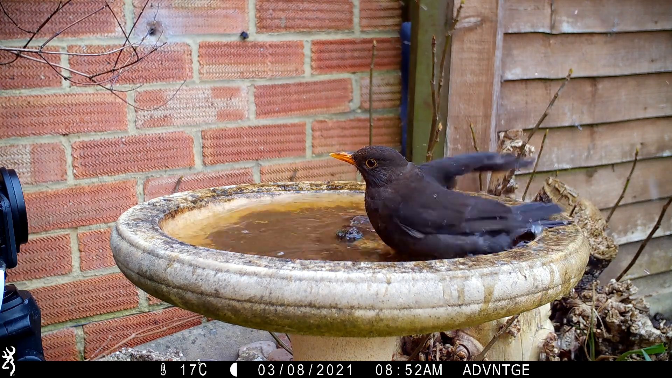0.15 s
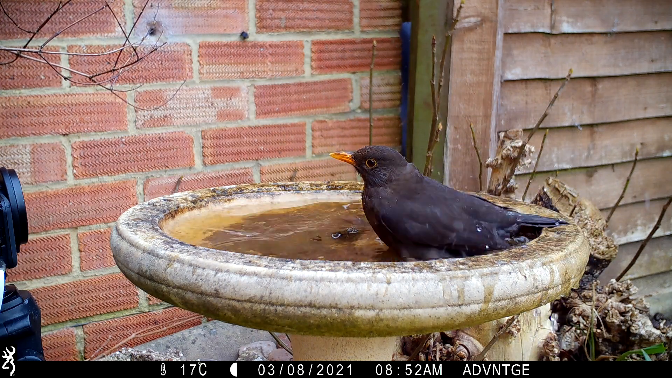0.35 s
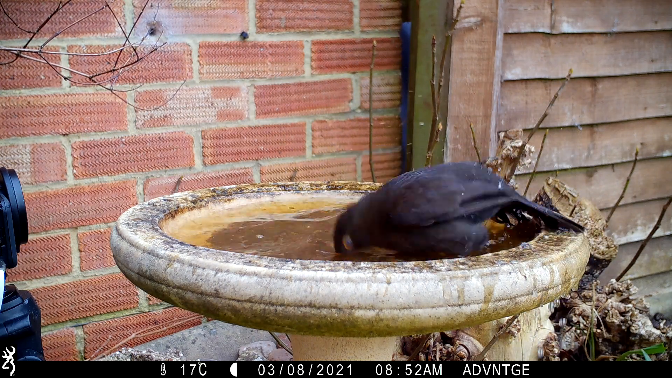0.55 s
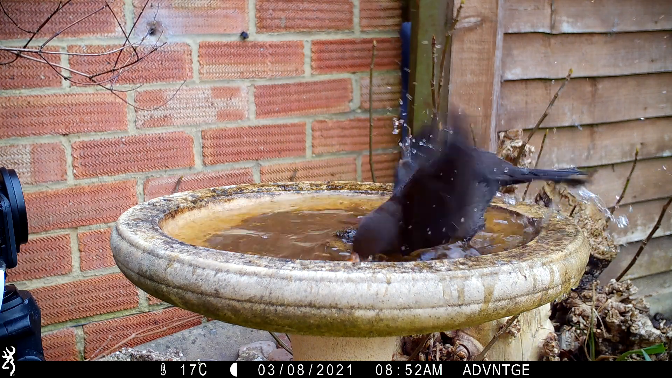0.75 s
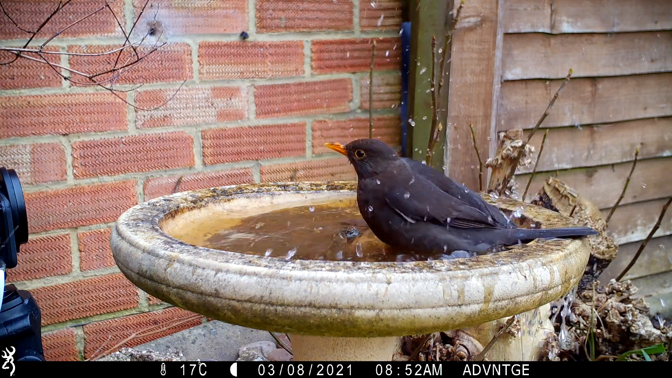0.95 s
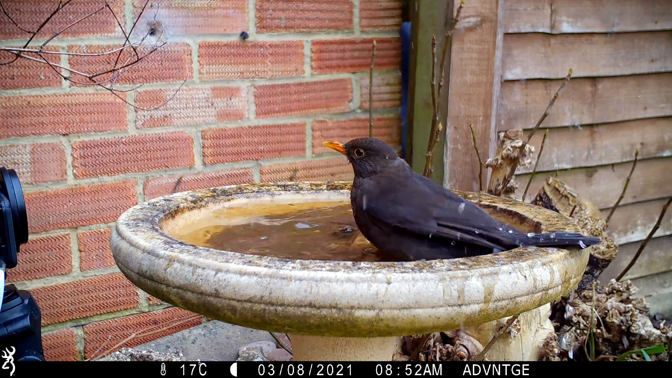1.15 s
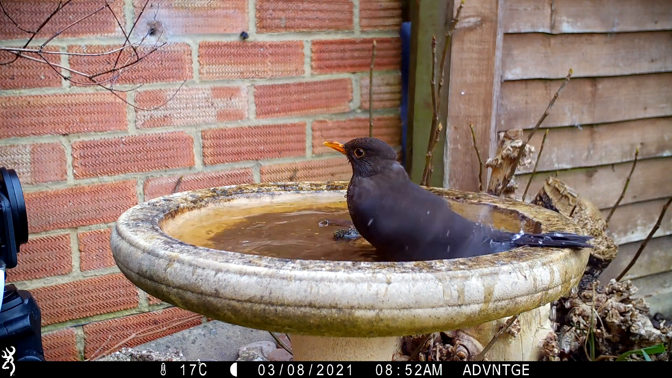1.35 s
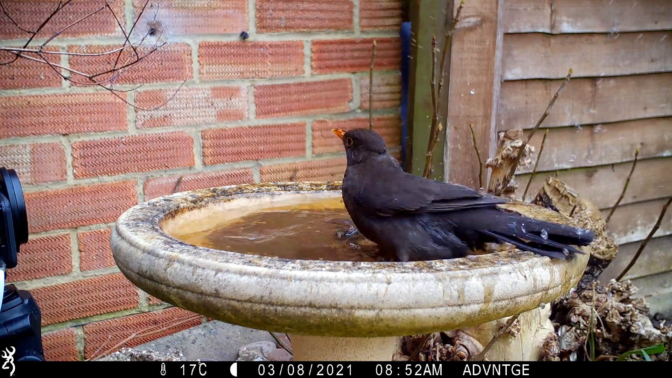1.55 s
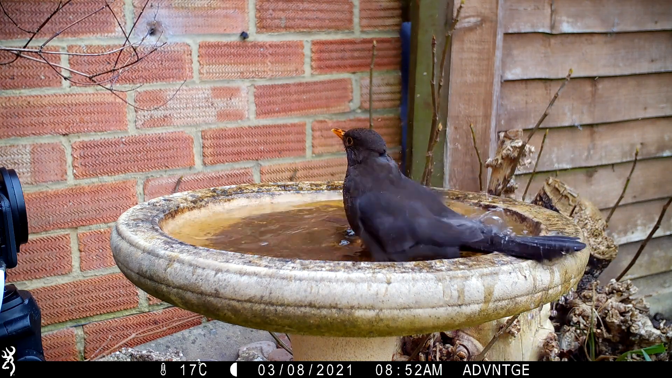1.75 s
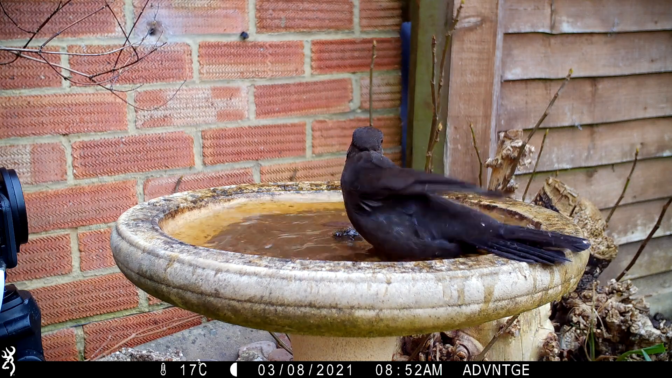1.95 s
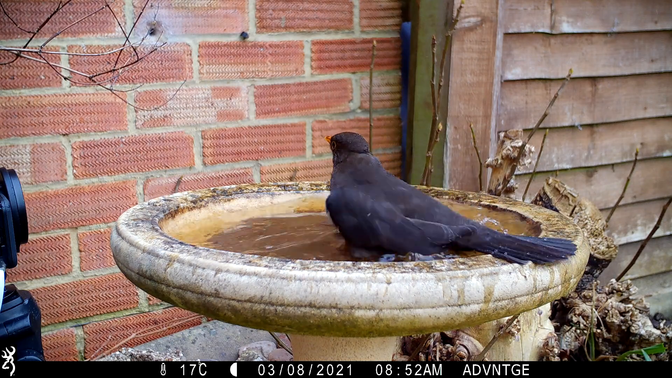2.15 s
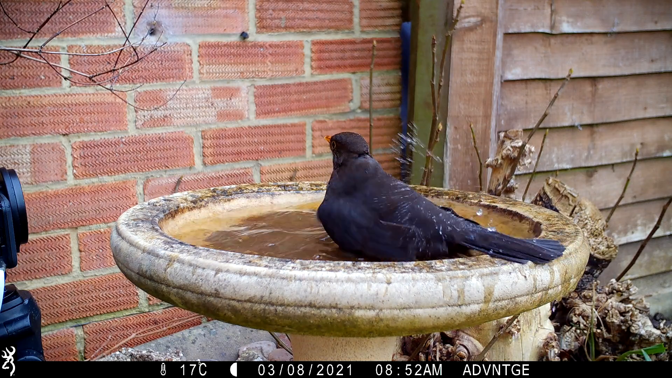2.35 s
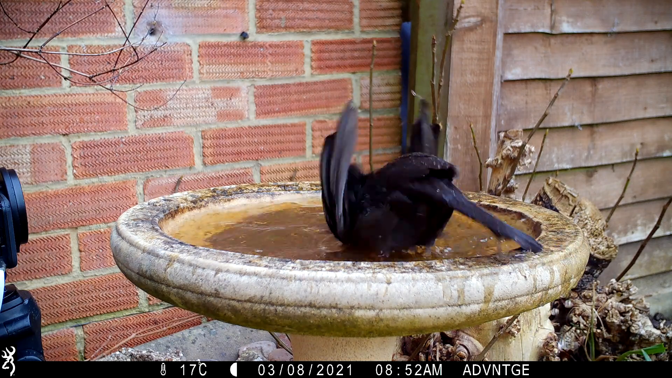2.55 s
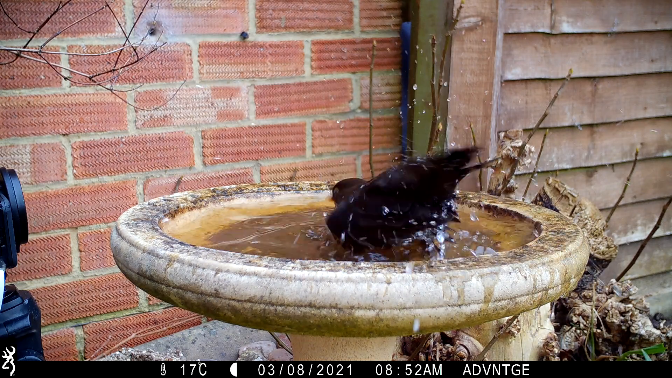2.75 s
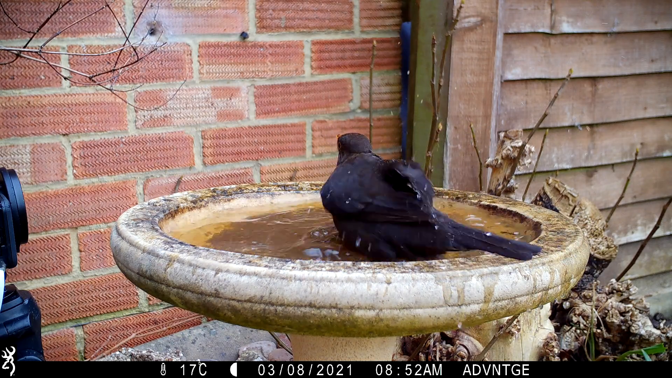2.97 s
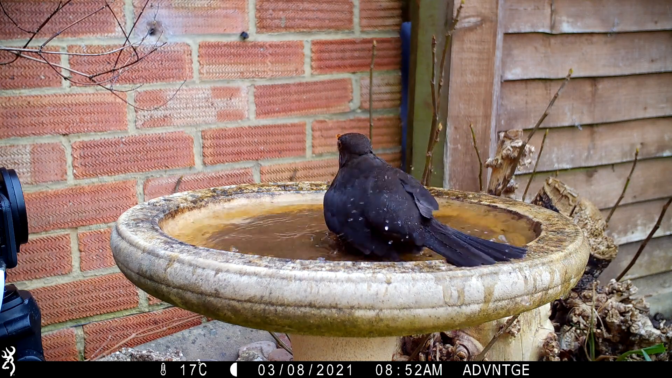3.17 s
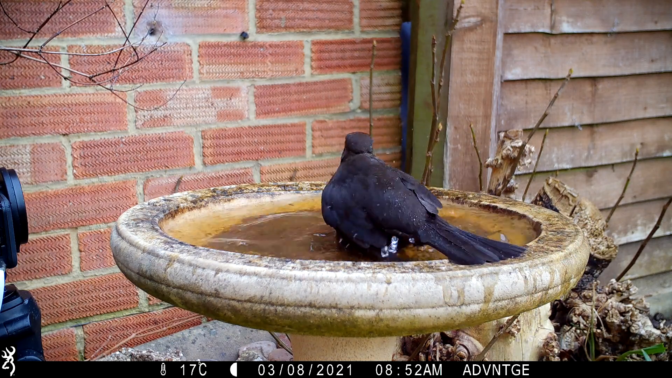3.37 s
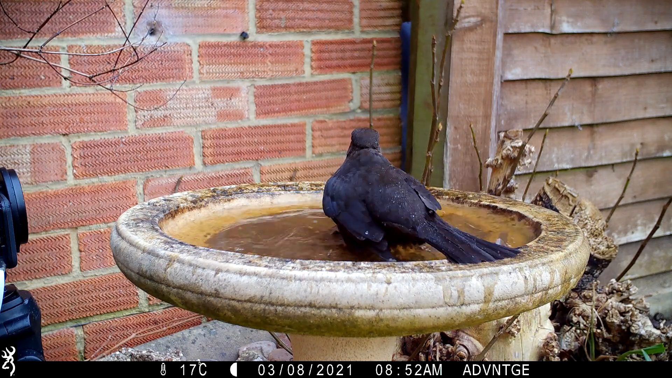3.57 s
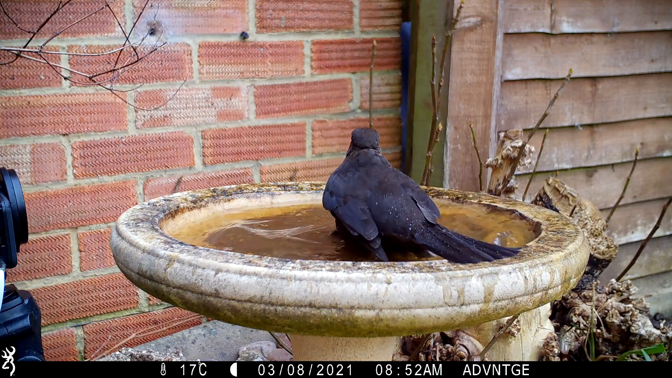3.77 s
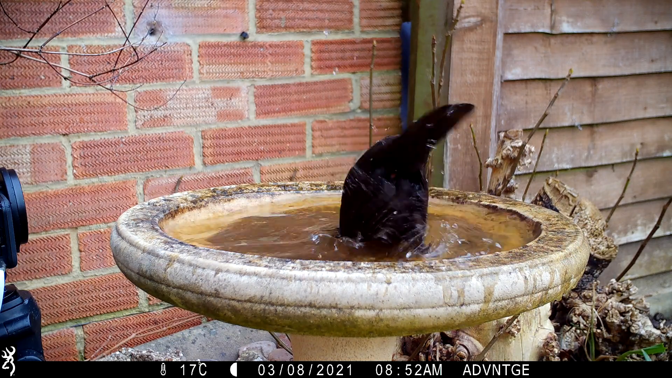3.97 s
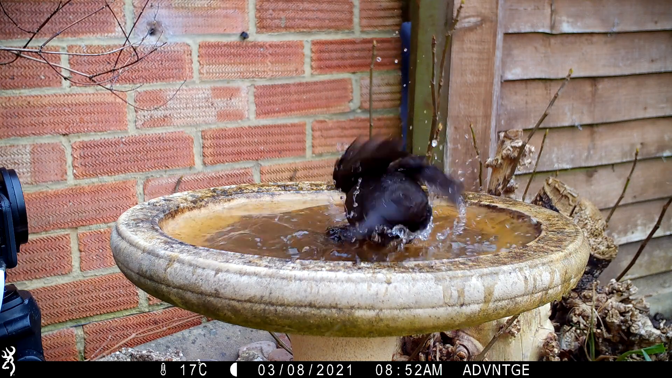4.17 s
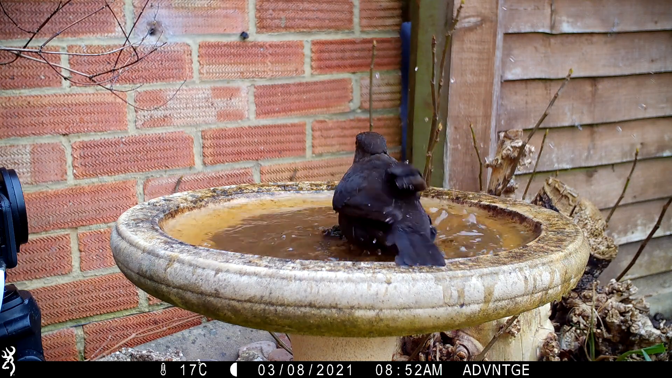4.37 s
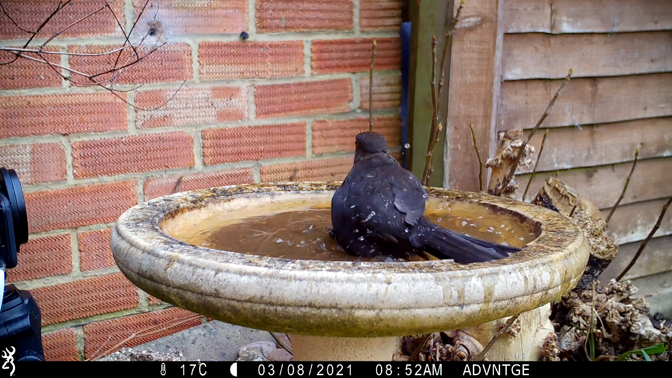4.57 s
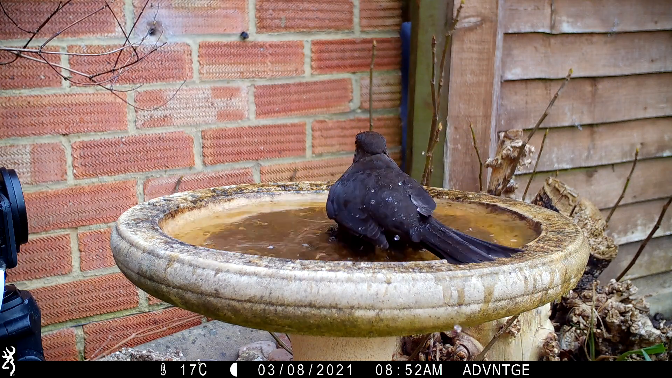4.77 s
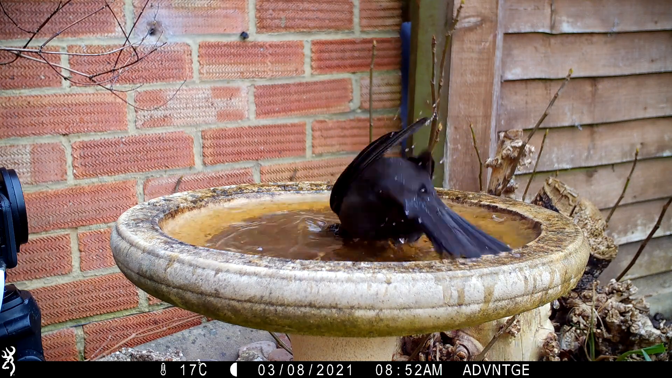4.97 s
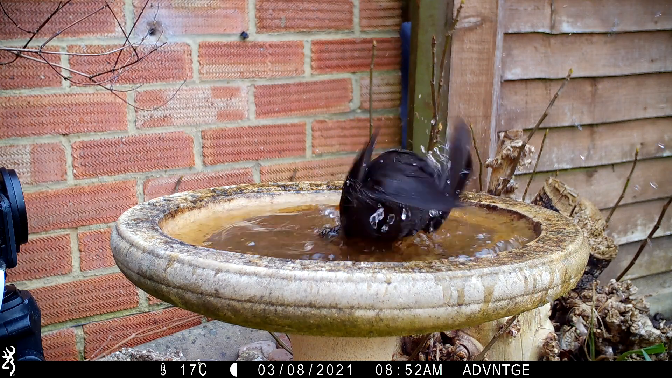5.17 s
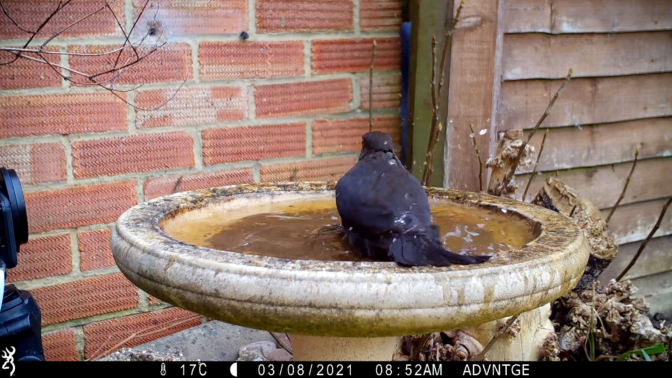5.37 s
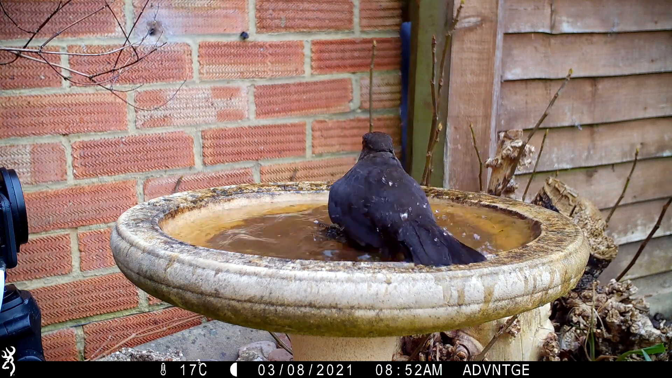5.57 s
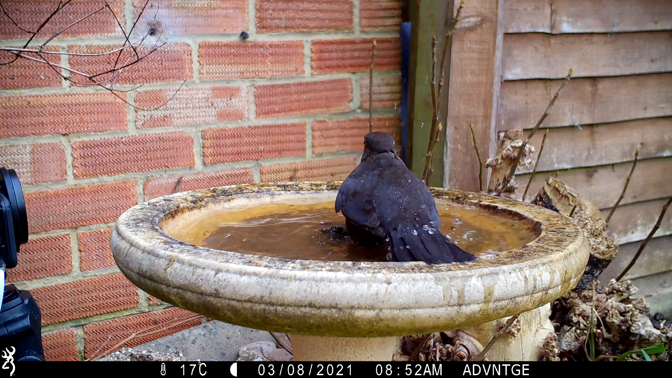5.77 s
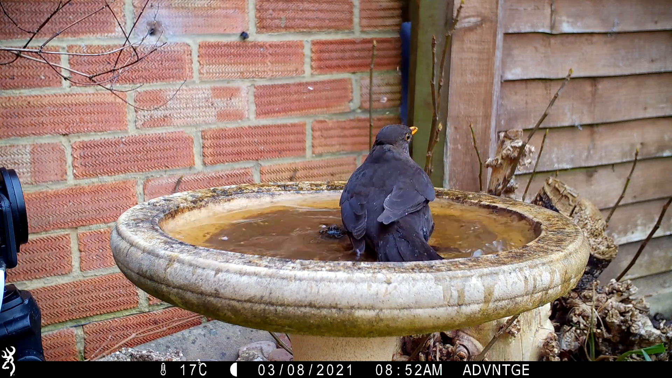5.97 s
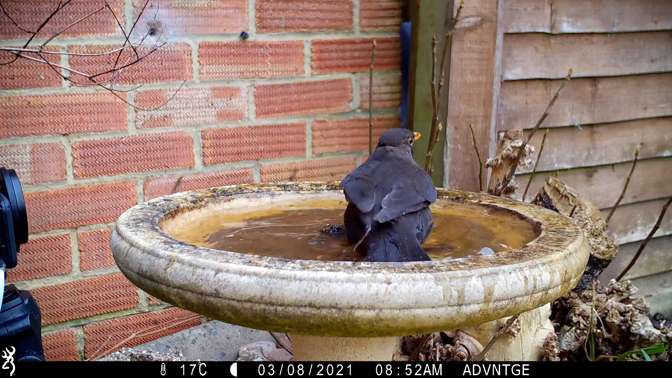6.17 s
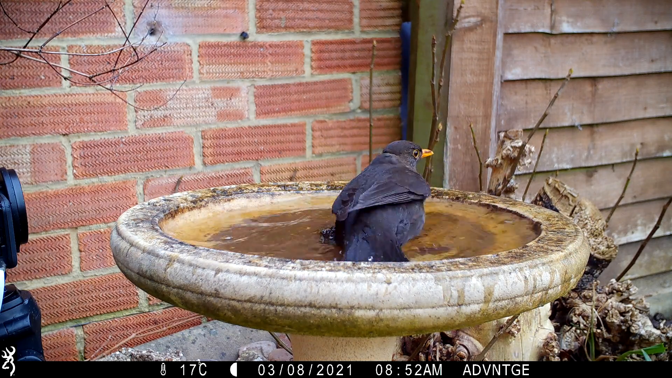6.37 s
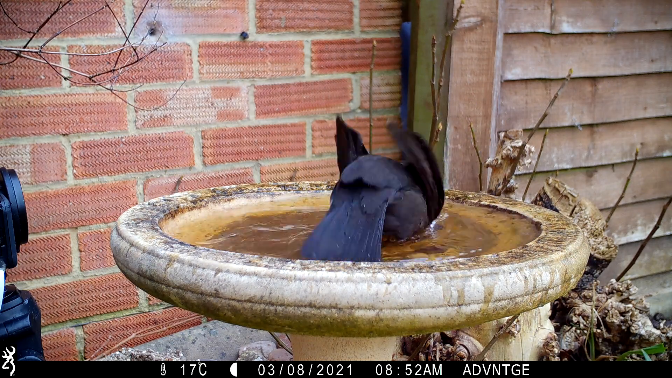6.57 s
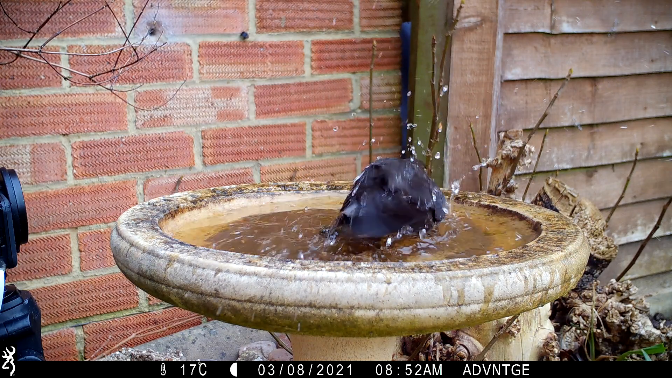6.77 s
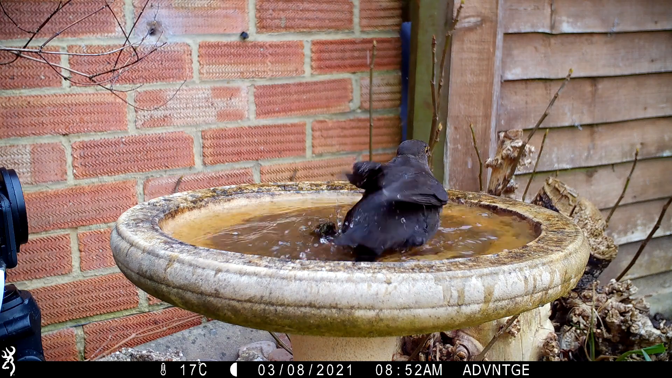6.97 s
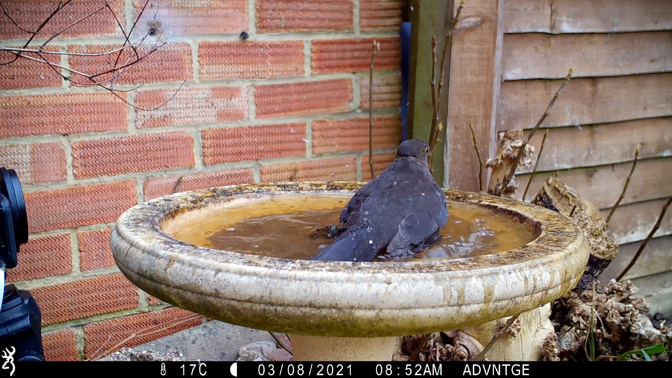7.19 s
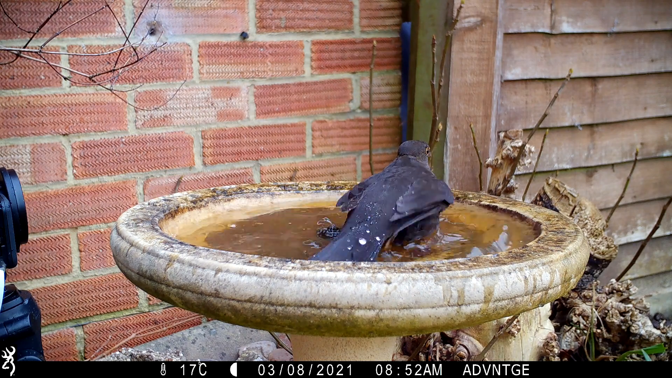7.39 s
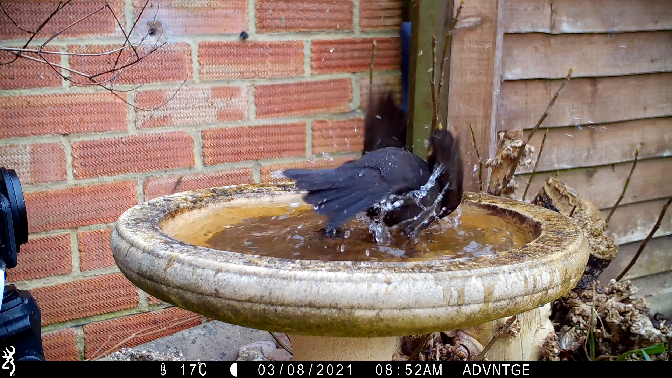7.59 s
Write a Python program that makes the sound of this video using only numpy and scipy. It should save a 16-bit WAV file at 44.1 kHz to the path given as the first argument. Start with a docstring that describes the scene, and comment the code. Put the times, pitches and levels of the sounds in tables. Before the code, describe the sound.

In a garden corner, heard from close by, a bird splashes in a stone basin: small sloshes, drips and bubbly plinks, two beak knocks, then a fast flurry of wet wing claps. It keeps ducking and shaking, each time with a short ringing knock and a spatter of water. Behind it are soft, steady outdoor air, thin distant whistles and twitters, and a barely audible hum and whine.

```python
"""A blackbird bathes in a shallow stone birdbath, in the corner of a brick wall and a fence.
Its wet wings clap, and its beak knocks the bowl as it ducks. The water sloshes, trapped air
plinks as bubbles, and flung drops patter down. Small birds call far off over a steady outdoor
rush. A small trail camera close by picks it all up and adds a faint hum and whine."""
import sys
import numpy as np
from scipy import signal
from scipy.fft import rfft, irfft
from scipy.io import wavfile
from scipy.ndimage import uniform_filter1d

SR = 44100
rng = np.random.default_rng(int(sys.argv[2]) if len(sys.argv) > 2 else 0)


def log_audio(samples):
    """Write samples as a 16-bit WAV file to the path given in sys.argv[1]."""
    # one column per channel
    frames = np.atleast_2d(samples).T
    # limit to full scale, then quantise
    limited = np.clip(frames, -1, 1)
    pcm = np.round(limited * 32767).astype(np.int16)
    wavfile.write(sys.argv[1], SR, pcm)


N = 336483
TIME = np.arange(N) / SR  # seconds since the scene began
AGE = np.arange(8192) / SR  # seconds since one short sound began


def undb(db):
    """Turn decibels into a number to multiply by."""
    return 10 ** (np.asarray(db) / 20)


def level(x, db):
    """Set a sound's average (rms) level."""
    return x * undb(db) / np.sqrt(np.mean(x ** 2))


def peak(x, db):
    """Set a sound's highest level."""
    return x * undb(db) / np.abs(x).max()


def add(track, s, sound):
    """Mix a sound into the track, starting at s seconds."""
    start = int(np.clip(s * SR, 0, N - 1))
    track[start:start + len(sound)] += sound[:N - start]


def band(x, hz, width_hz):
    """Keep the sound near one pitch; a narrower band rings longer."""
    sharpness = hz / min(width_hz, SR / 4)
    return signal.lfilter(*signal.iirpeak(min(hz, SR / 2 - 2000), sharpness, fs=SR), x)


def lowpass(x, hz, order):
    """Turn down the treble above hz; a higher order cuts more steeply."""
    return signal.sosfilt(signal.butter(order, min(hz, SR / 2 - 1), fs=SR, output="sos"), x)


def highpass(x, hz, order):
    """Turn down the bass below hz."""
    return signal.sosfilt(signal.butter(order, hz, "high", fs=SR, output="sos"), x)


def walk(rate):
    """A smooth random drift, about 1 in size, that changes course rate times a second."""
    step = int(SR / rate)
    drift = uniform_filter1d(np.repeat(rng.standard_normal(N // step + 1), step), step)[:N]
    return drift / drift.std()


def grains(rate, spread_db):
    """A short burst of tiny random hits, rate a second, a few much larger than the rest."""
    size = len(AGE)
    hits = (rng.random(size) < rate / SR) * rng.choice([-1, 1], size)
    return hits * undb(spread_db * np.minimum(rng.exponential(size=size), 4))


def click():
    """A single sharp hit."""
    return signal.unit_impulse(len(AGE))


def hiss():
    """A short burst of even noise."""
    return rng.standard_normal(len(AGE))


def fade(t60):
    """A fade that falls by 60 dB in t60 seconds."""
    return undb(-60 * AGE / t60)


def corner(x, echo_s, echo_db, tail_db, t60=0.068):
    """The brick wall sends back one echo; fence and paving scatter a short tail."""
    response = hiss() * fade(t60) * (AGE > .001)
    response *= undb(tail_db) / np.linalg.norm(response)
    response[0] = 1  # the sound that arrives directly
    response[int(echo_s * SR)] += undb(echo_db)
    return signal.fftconvolve(x, response)[:N]


def electronics(whine_hz=7796.2, buzz_hz=29.75, whine_db=-79):
    """The camera's low hum, and a high whine that buzzes as its wave keeps flipping upside down."""
    # tones of the hum: f/Hz, average level/dB
    hum_tones = [(66, -82.5), (100, -77)]
    hum = sum(undb(db) * np.sin(2 * np.pi * (hz * TIME + rng.random())) for hz, db in hum_tones)
    whine = np.sin(2 * np.pi * whine_hz * TIME) * signal.square(2 * np.pi * buzz_hz * TIME)
    return np.sqrt(2) * (hum + undb(whine_db) * band(whine, whine_hz, 2500))


def rush(rush_db=-49):
    """Steady outdoor air and far traffic, coloured by the hollow camera case."""
    # how strong the rush is from bass to treble: f/Hz, relative level/dB
    rush_shape = [(25, -16), (55, -11.5), (160, -9.5), (300, -7), (550, -2.5), (1100, 2), (1900, -0.5),
                  (2900, -3.5), (3900, -11), (4900, -22), (6000, -26.5), (8700, -43.5), (11500, -43),
                  (15500, -45)]
    # pitches at which the case rings: f/Hz, width/Hz, boost/dB
    case_rings = [(256.8, 18, 5), (397.6, 35, 9), (626.3, 89, 9), (983, 51, 5.5), (1460.5, 103, 10),
                  (1573, 27, 9), (2300, 210, 0.5), (2677, 80, 4), (3510, 93, 8), (3830, 35, 7)]
    hz = np.maximum(np.fft.rfftfreq(N, 1 / SR), 1)
    points_hz, points_db = np.transpose(rush_shape)
    db = np.interp(np.log(hz), np.log(points_hz), points_db)
    db += sum(boost / (1 + (2 * (hz - centre) / width) ** 2) for centre, width, boost in case_rings)
    air = irfft(rfft(rng.standard_normal(N)) * undb(db), N)
    return level(air, rush_db) * undb(0.53 * walk(0.95) + 0.053 * walk(26))


def twitter(count, note_s=0.023, arch_octaves=.2, leap_octaves=.11, spread_db=6):
    """A quick, uneven run of bird notes, as rows: t/s, length/s, f/Hz, arch/octaves, level/dB."""
    # the tune that the notes leap around: t/s, f/Hz, level/dB
    tune = [(4.885, 4045, -49), (5.03, 4300, -50.5), (5.17, 4600, -57), (5.35, 4400, -57.5),
            (5.52, 4120, -57)]
    times, tune_hz, tune_db = np.transpose(tune)
    late, leap, loud = rng.uniform(-1, 1, (count, 3)).T
    starts = np.linspace(times[0], times[-1], count) + late * note_s
    pitches = np.interp(starts, times, tune_hz) * 2 ** (leap_octaves * leap)
    levels = np.interp(starts, times, tune_db) + spread_db * loud
    return [(s, note_s, hz, arch_octaves, db) for s, hz, db in zip(starts, pitches, levels)]


def songbirds(flutter_db=3, waver_octaves=0.019, arch_octaves=0.019):
    """Far whistles and twitters, each rising and falling in pitch, blurred by the gardens between."""
    # thin whistles: t/s, length/s, f/Hz, level/dB
    whistles = [(0.599, 0.08, 3870, -55), (2.22, .091, 4370, -62), (3.295, 0.082, 3340, -52.5),
                (5.235, 0.0988, 3836, -55), (5.83, 0.11, 4180, -63)]
    out = np.zeros(N)
    notes = [(s, length, hz, arch_octaves, db) for s, length, hz, db in whistles]
    for s, length, hz, arch, db in notes + twitter(count=19):
        along = np.linspace(-1, 1, int(length * SR))
        pitch = hz * 2 ** (-arch * along ** 2 + waver_octaves * walk(250)[:len(along)])
        swell = np.sqrt(1 - along ** 2)
        add(out, s, undb(db) * swell * np.sin(2 * np.pi * np.cumsum(pitch) / SR))
    out *= undb(flutter_db * walk(200))
    return corner(out, echo_s=0.027, echo_db=-21, tail_db=-3.5, t60=0.48)


def vigour(build_s=.04, fade_s=.06, rest_db=-17):
    """How hard the bird throws water about: each shake builds up, holds and dies away."""
    # shakes of the body: t/s, length/s, strength/dB
    shakes = [(0, .42, 0), (0.721, .15, -3), (1.168, .14, 0), (1.397, .68, -4), (2.759, .1, -2),
              (3.0, .17, -10), (4.119, .11, 0), (5.099, .2, -1), (6.676, .38, -6), (7.497, .13, -8)]
    out = np.full(N, undb(rest_db))  # between shakes the wet feathers still drip
    for s, length, db in shakes:
        build = np.clip((TIME - s) / build_s, 0, 1)
        out += undb(db) * build * np.exp(-np.maximum(TIME - s - length, 0) / fade_s)
    return out


def small_events(db, spread_db, hz, octaves, follow, count):
    """Random rows (t/s, level/dB, f/Hz) that crowd into the shakes and gain follow dB per dB of vigour."""
    effort = vigour()
    share = (np.arange(count) + rng.random(count)) / count
    at = np.minimum(np.searchsorted(np.cumsum(effort), share * effort.sum()), N - 1)
    loud, high = np.clip(rng.standard_normal((count, 2)), -2, 2).T
    levels = db + follow * 20 * np.log10(effort[at]) + spread_db * loud
    return list(zip(at / SR, levels, hz * 2 ** (octaves * high)))


def spray(full_shake_db=-61, lowest_hz=2600, spread_db=5.5, fall_db_per_octave=9.0, ring_cycles=4.7):
    """Fine droplets patter down with every shake; the smallest are highest and faintest."""
    patter = np.zeros(N)
    for when, smallness, luck in rng.random((2600, 3)):
        octaves = 2.5 * smallness
        cycles = lowest_hz * 2 ** octaves * AGE[:256]
        db = spread_db * min(-np.log(luck), 4) - fall_db_per_octave * octaves
        ping = cycles * np.exp(-2 * cycles / ring_cycles) * np.sin(2 * np.pi * cycles)
        add(patter, when * N / SR, undb(db) * ping)
    patter = corner(patter, echo_s=0.0015, echo_db=-13.5, tail_db=-3.5)
    return level(patter, full_shake_db) * vigour()


def drops(spatter_s=0.0023, ring_db=1, drip_tick_db=-15, stray_db=-50.5, stray_hz=5800, stray_tick_db=-7):
    """Flung drops smack down: a short spatter, a tiny air pocket ringing, and a thin tick on top."""
    # the biggest drops: t/s, peak level/dB, f/Hz, tick compared with smack/dB (before a 4 dB cut)
    big_drops = [(.0493, -28, 4650, -17), (.113, -45, 6220, 0), (.18, -32.5, 5100, -13),
                 (.257, -35, 5470, -10), (0.4163, -20, 4180, -39), (0.7394, -32, 4900, -16),
                 (.809, -33, 4900, -23), (0.8847, -29.5, 5200, -25), (1.1401, -28.5, 5300, -19),
                 (1.2053, -34, 5460, -11), (1.216, -29.5, 4440, -28), (2.772, -30.5, 5470, -30),
                 (2.832, -28, 4000, -31), (4, -49.5, 7460, 3), (4.6429, -40.5, 5070, -1),
                 (5.222, -44, 5000, -10), (5.2803, -36, 4900, -15), (6.8826, -56.5, 5330, 10),
                 (7.6077, -40, 5270, -31)]
    out = np.zeros(N)
    drips = small_events(db=-42.5, spread_db=1.5, hz=5540, octaves=0.18, follow=0.94, count=44)
    drips = [(*drip, drip_tick_db) for drip in drips]
    # lone drips off the feathers and the rim
    strays = [(when * N / SR, stray_db, stray_hz * 2 ** (0.28 * (high - .5)), stray_tick_db)
              for when, high in rng.random((18, 2))]
    for s, db, hz, tick_db in big_drops + drips + strays:
        impact = click() + undb(-20) * hiss() * np.exp(-AGE / spatter_s)
        pocket = undb(ring_db) * band(impact, hz, 350)
        smack = lowpass(band(impact, hz, 4400) + pocket, hz * 1.22, order=7)
        tick = lowpass(band(impact, 10400, 3000), 12500, order=3)
        add(out, s, peak(smack, db) + peak(tick, db + tick_db - 4))
    return corner(out, echo_s=0.00071, echo_db=-24, tail_db=-14.5)


def sloshes(swell_s=0.001915, fade_s=0.0078, trim_db=-6.5):
    """Feathers churn the surface: a short rush of bursting water films and tiny hits."""
    # the biggest sloshes round the body: t/s, strength/dB, f/Hz
    big_sloshes = [(.058, -24.5, 1613), (.087, -25, 1100), (.217, -24.5, 1560), (.265, -31, 1370),
                   (.354, -30.5, 1190), (.388, -35, 1540), (0.809, -26, 1750), (1.076, -29, 950),
                   (1.252, -26.5, 2550), (2.088, -32.5, 1400), (2.526, -31, 1540), (2.842, -30, 1620),
                   (3.162, -29.5, 1190), (3.33, -32.5, 1680), (4.582, -29, 1500), (5.27, -38, 1650),
                   (5.59, -33.5, 1200), (6.901, -32.5, 1070), (7.033, -31.5, 1100), (7.161, -33.5, 1500)]
    out = np.zeros(N)
    surge = (1 - np.exp(-AGE / swell_s)) * np.exp(-AGE / fade_s)
    laps = small_events(db=-35, spread_db=3.5, hz=1900, octaves=.35, follow=.2, count=48)
    for s, db, hz in big_sloshes + laps:
        water = lowpass(band(grains(2500, 5.7), hz, 1470), 3500, order=3)
        water = highpass(water, 360, order=2)
        add(out, s - swell_s, level(water, db + trim_db) * surge)
    return corner(out, echo_s=0.0033, echo_db=-4, tail_db=-14.0)


def bubble(hz, t60, rise):
    """Trapped air rings and climbs in pitch, by an octave at most, as it nears the surface."""
    pitch = hz * 2 ** np.minimum(rise * AGE, 1)
    return band(np.sin(2 * np.pi * np.cumsum(pitch) / SR) * fade(t60), hz, hz)


def bubbles(splash_db=-16, splash_s=0.0086):
    """Clear plinks, each born in a little splash, among many faint ones in the rocking water."""
    # the clearest bubbles: t/s, level/dB, f/Hz, time to fade 60 dB/s, pitch rise/(octaves a second)
    plinks = [(.258, -32.5, 2680, 0.057, 11), (0.2644, -30, 1155, 0.13, 17),
              (.8346, -25.5, 1885, 0.13, 1.07), (.886, -32, 1027, 0.044, 3.4),
              (2.775, -27.5, 1755, 0.065, 1.5), (2.7962, -22, 2033, 0.045, 10),
              (3.507, -35, 2304, 0.082, 8.4), (3.6248, -33.5, 2726, 0.1, 3.1),
              (4.0532, -21.5, 1230, .013, 4), (4.102, -32, 1536, .054, 27), (4.19, -33, 1660, 0.092, 7.2),
              (4.3228, -25.5, 1634, 0.11, .45), (4.604, -42, 2460, 0.12, 3.1),
              (5.909, -39.5, 1905, 0.078, 2), (6.183, -37, 1566, .033, 2.5),
              (6.317, -42.5, 2640, 0.06, 1.7), (6.723, -35, 3540, .019, 3), (6.7307, -27, 2560, 0.02, 4.9),
              (6.9275, -35, 2620, 0.034, 22), (7.0505, -37, 2660, 0.035, 6.6),
              (7.612, -28, 1664, 0.026, 2.3)]
    out = np.zeros(N)
    for s, db, hz, t60, rise in plinks:
        splash = lowpass(band(grains(2500, 5.1), hz, 1200), 3460, order=4)
        splash = level(splash, db + splash_db) * np.exp(-AGE / splash_s)
        add(out, s, undb(db) * bubble(hz, t60, rise) + splash)
    for s, db, hz in small_events(db=-42.5, spread_db=1.9, hz=2194, octaves=.3, follow=0.04, count=190):
        add(out, s, undb(db) * bubble(hz, t60=0.023, rise=14 * rng.random()))
    return corner(out, echo_s=.0045, echo_db=-18, tail_db=-9.5, t60=0.11)


def pecks():
    """The beak hits stone through the water: a dull knock echoes off the wall, and the bowl rings on."""
    # beak strikes: t/s, knock level/dB, f/Hz, width/Hz, ring strength/dB
    strikes = [(0.6016, -15, 1620, 2400, -29), (0.7365, -18.5, 2470, 2360, -50),
               (2.558, -18, 2050, 1300, -46), (3.9252, -12, 2049, 1460, -26), (5.0066, -15, 1970, 582, -53),
               (6.5883, -16, 1960, 920, -23.5), (7.489, -13, 1900, 920, -28)]
    # tones of the stone bowl: f/Hz, relative level/dB, time to fade 60 dB/s
    bowl_tones = [(1783, -1.5, 0.11), (1830, -31.5, 0.042), (2130, -15.5, .03), (1076, -14.5, 0.065)]
    knocks, rings = np.zeros((2, N))
    bowl = sum(undb(db) * fade(t60) * np.sin(2 * np.pi * hz * AGE) for hz, db, t60 in bowl_tones)
    for s, knock_db, hz, width_hz, ring_db in strikes:
        knock = lowpass(band(click(), hz, width_hz), 2360, order=6)
        add(knocks, s, peak(knock, knock_db))
        add(rings, s, undb(ring_db) * lowpass(bowl, 3980, order=6))
    return corner(highpass(knocks, 740, order=3), echo_s=0.00411, echo_db=-8.5, tail_db=-6.5) + rings


def wings(lead_s=0.011, swell_s=0.0037, fade_s=0.0042, cup_hz=1080, cup_db=3, wet_db=-37, air_db=-10):
    """Wet feathers push air aside and rustle up to a clap, which flicks off water."""
    # wing beats: t/s, clap peak/dB, rustle level/dB, clap base f/Hz, clap bass cut/Hz
    beats = [(1.399, -28, -38.5, 1500, 630), (1.431, -28.5, -41.5, 2000, 630),
             (1.5437, -12.5, -28.5, 1540, 610), (1.6697, -23.5, -33, 1480, 450),
             (1.7952, -11, -31.5, 1600, 423), (1.9113, -14, -27.5, 2100, 700), (2.0373, -6, -34, 1630, 900),
             (2.176, -29, -42.5, 1490, 630)]
    out = np.zeros(N)
    stroke = np.exp(np.minimum((AGE - lead_s) / swell_s, (lead_s - AGE) / fade_s))
    cup = undb(cup_db) * band(click(), cup_hz, 260)  # air cupped under the wing rings
    for s, clap_db, rustle_db, base_hz, cut_hz in beats:
        clap = lowpass(band(click(), base_hz * 1.3, 1560) + cup, 2680, order=3)
        add(out, s, peak(highpass(clap, cut_hz, order=3), clap_db))
        rustle = lowpass(band(hiss(), 1250, 2300), 2300, order=2)
        rustle = level(highpass(rustle, 910, order=3), rustle_db)
        air = level(lowpass(band(hiss(), 470, 250), 580, order=5), rustle_db + air_db)
        flick = lowpass(band(grains(5000, 3), 13600, 5000), 13000, order=3)
        add(out, s - lead_s, (rustle + air + level(flick, rustle_db + wet_db)) * stroke)
    return corner(highpass(out, 150, order=3), echo_s=.0054, echo_db=-10.5, tail_db=-12)


def scene():
    """Everything that reaches the one microphone."""
    bath = wings() + pecks() + bubbles() + sloshes() + drops() + spray()
    return (bath + songbirds() + rush() + electronics())[None]


def record(dry):
    """The camera cuts off the highest treble."""
    top_hz = 15800
    return signal.sosfilt(signal.ellip(10, .2, 70, top_hz, fs=SR, output="sos"), dry)


dry = scene()
out = record(dry)
log_audio(out)
```